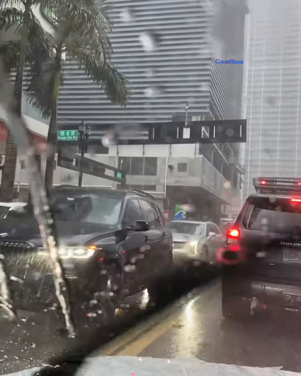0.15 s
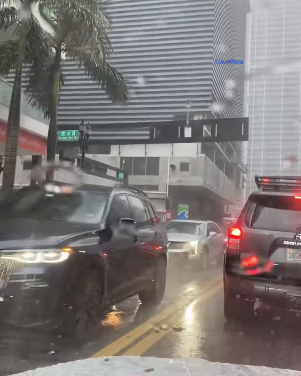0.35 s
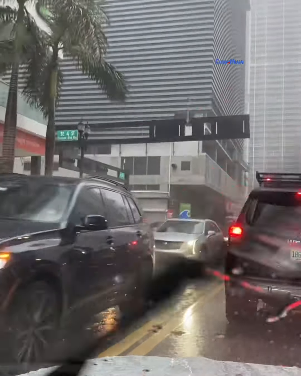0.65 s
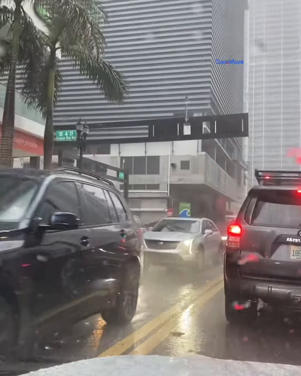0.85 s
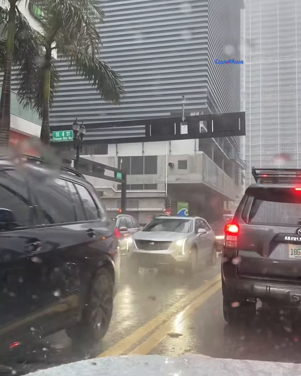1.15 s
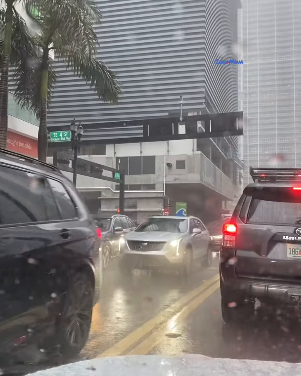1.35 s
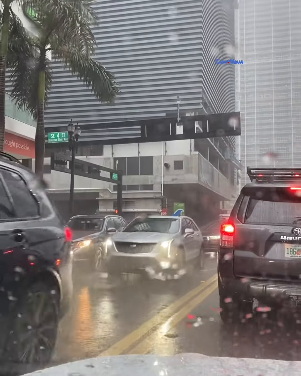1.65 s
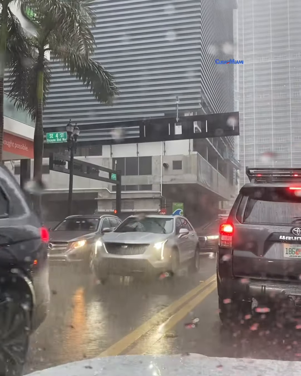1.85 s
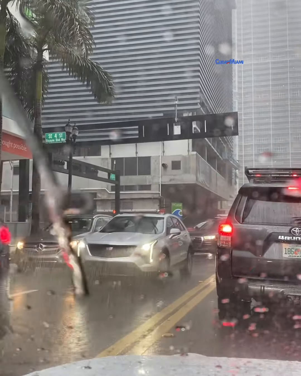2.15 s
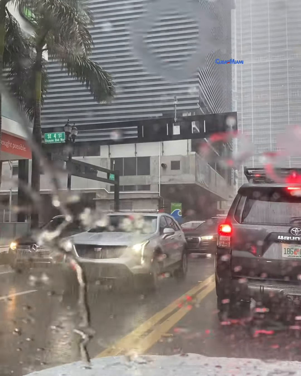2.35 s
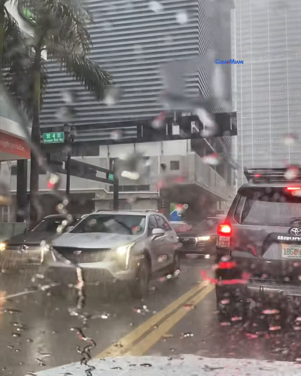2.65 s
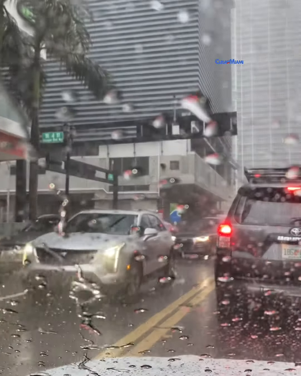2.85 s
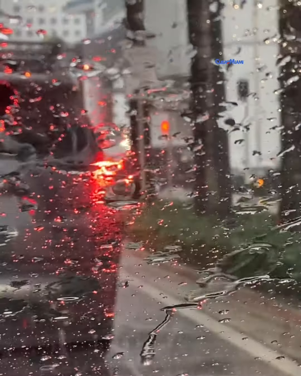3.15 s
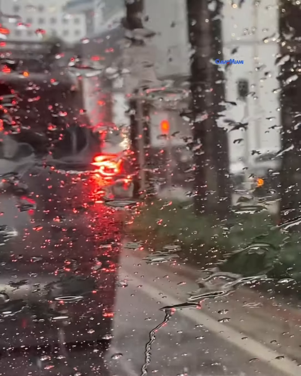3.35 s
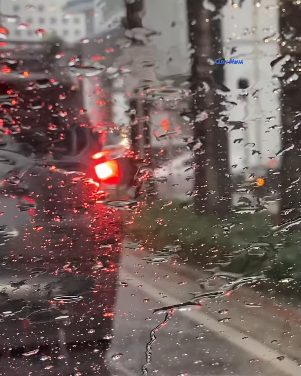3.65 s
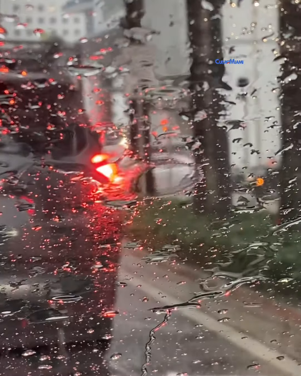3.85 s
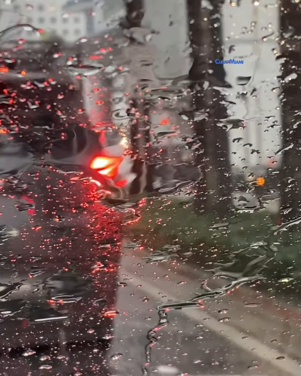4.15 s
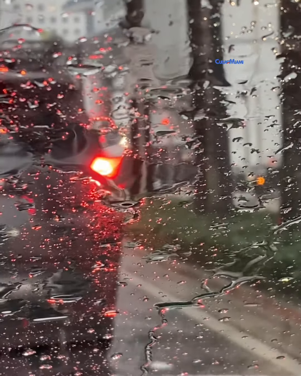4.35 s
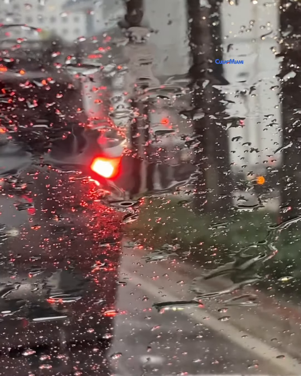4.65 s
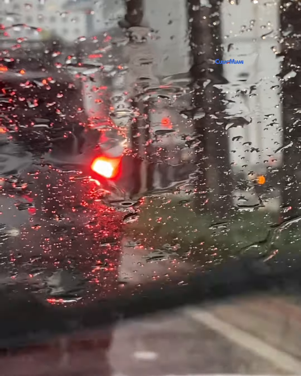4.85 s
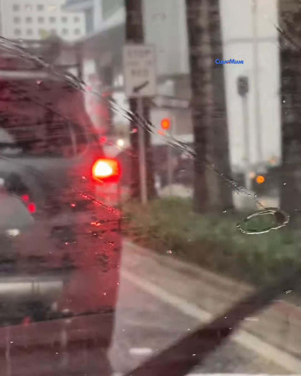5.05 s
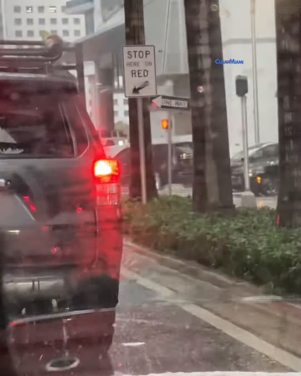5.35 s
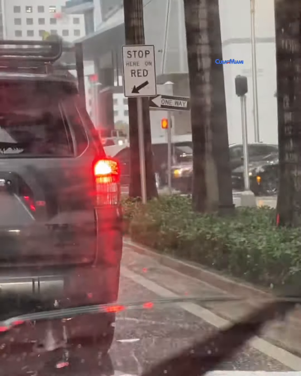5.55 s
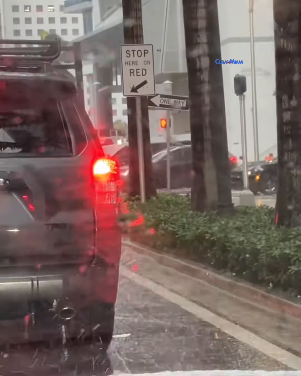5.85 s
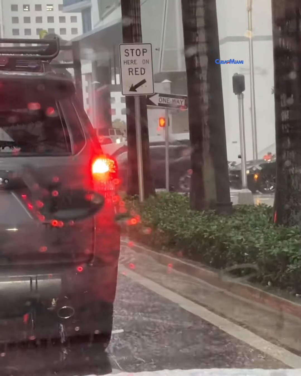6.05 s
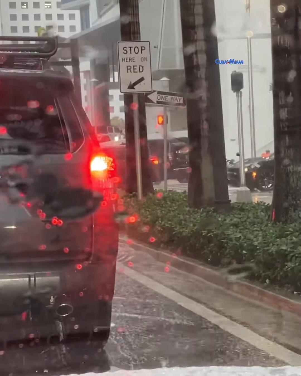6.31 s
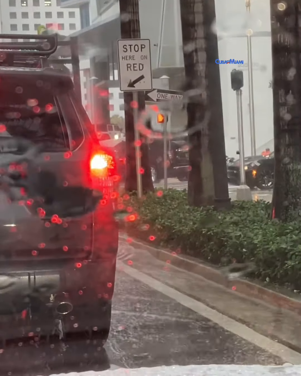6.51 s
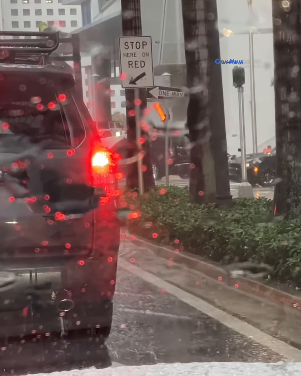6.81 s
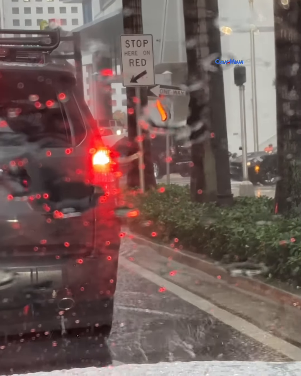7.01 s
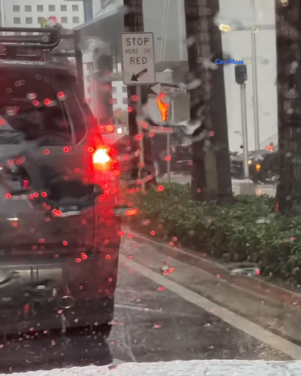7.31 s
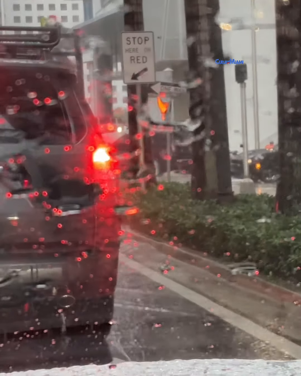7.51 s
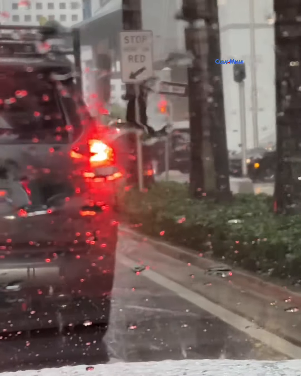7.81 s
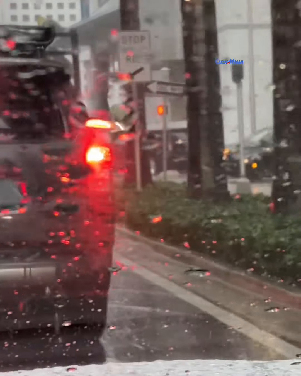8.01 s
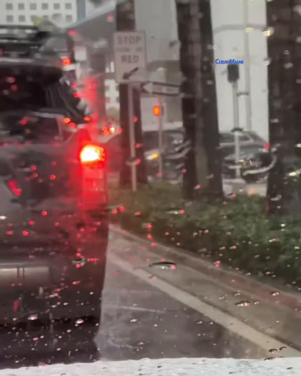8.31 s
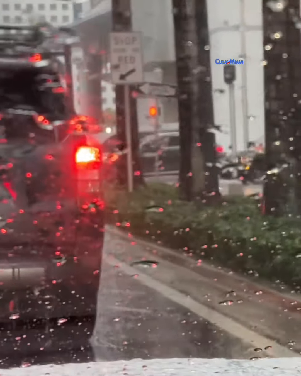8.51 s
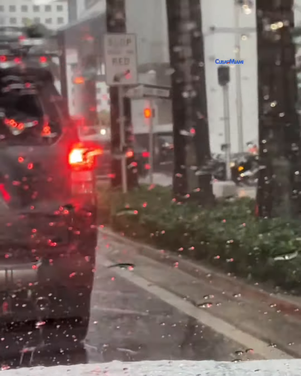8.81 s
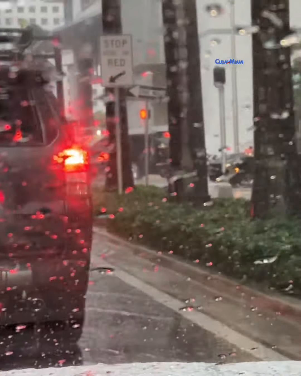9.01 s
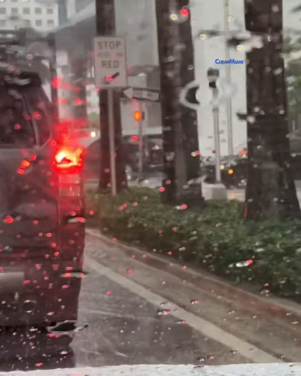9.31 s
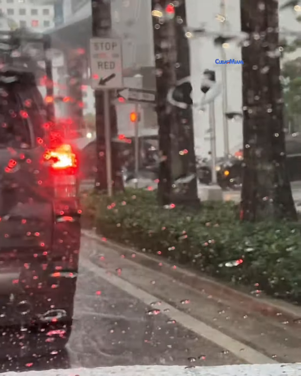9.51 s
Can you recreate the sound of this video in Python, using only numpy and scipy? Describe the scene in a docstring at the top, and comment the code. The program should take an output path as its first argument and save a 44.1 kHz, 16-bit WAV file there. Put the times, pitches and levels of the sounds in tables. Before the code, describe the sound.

Close stereo perspective inside a closed car waiting in city traffic. Dense rain roars and drums on the roof and hisses on the glass over a low engine throb, with wiper thumps near the start. At three seconds it cuts abruptly to much lighter rain: individual taps, small spatters and faint plinks. The wipers sweep again around five seconds with deep thuds, then sparse drops continue.

```python
"""Heavy rain on a car that waits in traffic, heard from inside: noise bursts of random size drum on the roof
and tick on the windshield, coloured by panel resonances. After three seconds the scene cuts to lighter rain,
in which single drops, swelling and dying bursts of noise, stand out. The wipers sweep twice: filtered noise for
the drag, gliding sines for the thumps where they turn and park. A faint sine squeaks once. Low noise rumbles
throughout, with the sine throb of the idling engine under the downpour."""
import sys
import numpy as np
from scipy import signal
from scipy.fft import rfft, irfft, next_fast_len
from scipy.io import wavfile

SR = 44100
rng = np.random.default_rng(int(sys.argv[2]) if len(sys.argv) > 2 else 0)


def wav_record(signal):
    """Record a signal, one row per channel, as 16-bit PCM in the file named by sys.argv[1]."""
    frames = np.transpose(np.atleast_2d(signal))
    bounded = np.clip(frames, -1, 1)
    # unit amplitude maps onto the largest positive 16-bit level
    quanta = np.round(bounded * 32767).astype(np.int16)
    wavfile.write(sys.argv[1], SR, quanta)


N = 426447
TIME = np.arange(N) / SR
HZ = np.fft.rfftfreq(N, 1 / SR)

# strength of the downpour before its trims: time_s, roof_patter_db, glass_hiss_db
DOWNPOUR_LEVELS = [(0, -42.5, -47.5), (.15, -41.5, -45.5), (.55, -45.5, -48.5), (.9, -45, -47),
                   (1.45, -46.5, -47.5), (2.08, -41.5, -43.5), (2.6, -40.5, -41.5), (2.85, -41, -44.5),
                   (3.08, -42.5, -44.5)]
# strength of the lighter rain before its trim: time_s, level_db
SHOWER_LEVELS = [(3.12, -53.5), (3.24, -52.5), (3.36, -56.5), (3.39, -53.5), (3.6, -51), (3.85, -49.5),
                 (4.28, -54.5), (4.4, -61.5), (4.49, -61), (4.53, -56), (4.7, -54), (5.15, -52.5),
                 (5.3, -49), (6.0, -50.5), (6.45, -51), (6.95, -53), (7.3, -56.5), (7.9, -59), (8.3, -56.5),
                 (9.1, -56.5), (9.35, -55.5), (9.55, -56)]
# strongest flurries of larger drops, before the panel trims: start_s, roof_db, glass_db, rise_s
FLURRIES = [(.114, -43, -59, 0.0079), (1.285, -42, -58, 0.0088), (1.574, -38.5, -55.5, 0.009),
            (3.425, -53, -65, 0.0059), (3.971, -50, -74, 0.0063), (4.775, -55, -68, 0.0065),
            (5.698, -46.5, -64, 0.0076), (6.595, -48, -71, .007), (6.861, -44.5, -69, 0.013),
            (6.94, -58, -71, 0.0068), (7.002, -47, -74, 0.0085), (7.16, -53, -80, 0.0099),
            (8.195, -50.5, -74, 0.0095), (8.253, -52, -69, 0.0082), (8.895, -56, -80, 0.0062),
            (9.012, -54, -70, 0.0062), (9.262, -49, -72, 0.011), (9.29, -57, -78, 0.0076)]
# relative colour of the rain as heard, with a dip near 14 kHz: frequency_hz, downpour_db, shower_db
RAIN_COLOUR = [(101, -12, -21), (245, 6.5, 2), (387, 2, 2.3), (587, 1.5, -1.7), (850, -2.5, -4.5),
               (1110, -5.5, -6), (1700, -8.6, -10), (2550, -11, -13.5), (4840, -11, -14.5),
               (6550, -10.5, -13), (8700, -16.5, -18.5), (12140, -21, -24.5), (13900, -32, -35),
               (15800, -24, -25)]
# resonances of the roof and glass, before scaling by boxiness: frequency_hz, width_hz, level_db
PANEL_MODES = [(430, 30, 2.5), (510, 46, 2), (845, 81, 8), (1135, 52, 3), (1380, 87, 1.2), (2260, 360, 3),
               (2745, 140, 6), (3620, 770, 4.5)]
# left-right correlation of the rain: frequency_hz, downpour_correlation (-1 to 1), shower_correlation (-1 to 1)
EAR_CORRELATION = [(131, 1, 0.75), (302, 0.88, 0.87), (630, 0.38, 0.43), (1420, 0.12, 0.082),
                   (2000, 0.07, 0.82), (3450, 0.03, 1), (4360, 0.32, 0.85), (7520, 1, 1),
                   (8540, 0.72, 0.66), (12500, 1, 0.96)]
# big drops close by, levels before the common trims: start_s, pane_tap_db, treble_tick_db, splat_length_s
BIG_DROPS = [(1.085, -26.5, -53, 0.0014), (1.1105, -27, -64, 0.0043), (2.1234, -26, -42, .003),
             (3.030, -36, -50, .004), (3.144, -41, -58, .002), (3.156, -40, -59, .003),
             (3.391, -31, -60, .004), (3.484, -42, -60, .002), (3.52, -34.5, -57, .002),
             (3.531, -31, -55, .003), (3.616, -33.5, -58, .003), (3.762, -39, -59, .003),
             (3.789, -34, -60, .005), (4.079, -33, -55, .003), (4.1263, -35, -60, .004),
             (4.207, -34, -70, .006), (4.348, -38, -63, .003), (4.5176, -39, -60, .0015),
             (4.536, -37, -60, .0025), (4.556, -34, -62, 0.0028), (4.574, -39, -59, .002),
             (4.7202, -33, -63, 0.001), (4.794, -34, -62, .0025), (4.881, -37, -57, .002),
             (5.218, -30.5, -56, 0.0056), (5.896, -38, -55, .003), (5.9604, -43, -56, .002),
             (6.602, -35, -68, .005), (6.7, -36, -58, .003), (6.871, -32, -64, 0.0083),
             (6.945, -35, -57, .004), (6.955, -38, -58, .002), (7.004, -32, -56, .004),
             (7.012, -35, -62, 0.0052), (7.147, -38, -62, 0.0033), (7.184, -31.5, -64, .008),
             (7.2835, -36.5, -57.5, .002), (7.608, -41, -60, .003), (7.690, -37, -61, .003),
             (7.784, -39, -62, 0.0034), (7.825, -34, -57, .0045), (7.924, -31.5, -63, .007),
             (7.962, -37, -64, .003), (8.011, -32.5, -76, .009), (8.328, -31.5, -75, 0.0089),
             (8.545, -33.5, -55.5, 0.0045), (8.797, -33, -56, 0.0039), (8.899, -43, -62, .003),
             (8.9665, -34, -61, .002), (9.139, -39, -61, 0.0022), (9.173, -42, -62, .003),
             (9.183, -43, -62, .002), (9.242, -35, -59, 0.0029), (9.284, -30, -52, .006),
             (9.343, -36, -59, .0035), (9.3715, -36, -58, .003), (9.388, -29, -53, 0.0039),
             (9.529, -44, -61, .003), (9.577, -35, -71, 0.0022), (9.597, -34, -58, 0.0051)]
# colour of the bright tick: frequency_hz, gain_db
TICK_COLOUR = [(1500, -20), (3000, -5), (5500, 5.5), (10000, 4.5), (13000, -4), (16000, -6)]
# colour of the tap on the pane: frequency_hz, gain_db
TAP_COLOUR = [(200, -9), (500, 4.5), (1100, 0.5), (3500, -0.5), (5500, -3.5), (9000, -20)]
# thumps of the wipers: start_s, level_db, first_pitch_hz, last_pitch_hz, swell_s, body_ring_db,
# knock_pitch_hz, knock_db, knock_swell_s, scuff_db
THUMPS = [(0.112, -33, 193, 167, 0.03, -32, 257, -36.5, 0.037, -64),
          (0.236, -33.5, 151, 183.5, 0.025, -40, 281, -29.5, 0.011, -48),
          (0.464, -16.5, 284, 118, 0.024, -22, 273, -18.5, 0.0097, -31),
          (0.476, -17.5, 69, 76.7, 0.018, -39, 130.3, -16.5, 0.018, -55),
          (0.654, -28, 151, 112, 0.021, -48, 270, -49, 0.0092, -62),
          (1.1, -22.5, 99, 57, 0.04, -50, 154, -32.5, 0.046, -50),
          (1.163, -23, 101, 81, 0.03, -44, 179, -44, 0.033, -60),
          (4.526, -32.5, 100, 166, 0.041, -33, 331, -42, 0.0086, -43),
          (4.604, -30, 250, 115, 0.015, -32, 399, -44.5, 0.021, -51),
          (4.6308, -13, 93, 92.6, 0.028, -30.5, 443, -38.5, 0.01, -42),
          (4.7014, -24, 93.5, 96, 0.033, -43, 325, -46, 0.024, -53),
          (5.03, -29.5, 90, 70, 0.04, -44, 230, -44, .02, -58),
          (5.134, -28, 267, 163, 0.021, -43, 331, -37, 0.011, -48),
          (5.3567, -19.5, 147, 62.4, 0.0266, -30, 147, -20, 0.026, -44),
          (5.3636, -15, 211, 130.7, 0.014, -25, 230, -23, 0.016, -40),
          (5.4104, -25, 131, 78.5, 0.0665, -39, 107, -27, 0.019, -54),
          (6.0, -25, 83.7, 49, 0.021, -38, 140.4, -27.5, 0.029, -58),
          (6.017, -36, 259, 170, .014, -47, 298, -41, 0.011, -47),
          (6.034, -23.5, 51.6, 73, 0.034, -40, 109, -25, 0.019, -58)]
# modes of the windshield and cabin, relative levels: frequency_hz, level_db, t60_s
BODY_MODES = [(66, -7, .55), (84, 0, .65), (167, 0, .24), (238, 0, .17), (305, -8, .12)]
# relative colour of rubber flipping on wet glass: frequency_hz, gain_db
SCUFF_COLOUR = [(120, -31), (300, 12), (500, -2), (800, -5.5), (1500, -29), (3000, -34)]
# strokes of the wipers, up then back, twice: start_s, length_s, shudder_db, fade_db_per_s
SWEEPS = [(0, 0.49, -33, 16), (.5, 0.53, -39, 17), (4.727, 0.52, -33.5, 13), (5.496, .72, -41, 2.5)]
# swells of the low rumble: centre_s, half_width_s, level_db
SWELLS = [(2.4, 0.44, -45), (3.72, 0.17, -42), (7.05, 0.17, -42.5)]
# relative colour of the shudder and the swells: frequency_hz, gain_db
DRAG_COLOUR = [(30, -7), (52, 8), (90, 1.5), (130, -2), (180, -7), (300, -14.5), (500, -29.5),
               (1200, -48.5)]
# relative colour of the cabin's low rumble: frequency_hz, downpour_db, shower_db
RUMBLE_COLOUR = [(20, -74, -91), (31.8, -72, -71), (45, -58.5, -57), (61, -57, -61.5), (80.4, -56.5, -60),
                 (100.5, -59, -65.5), (137, -60, -68), (161, -57, -70), (210, -65.5, -73.5),
                 (287, -70.5, -78), (452, -85, -93), (1200, -130, -130)]
# level balance between the channels: frequency_hz, left_over_right_db
BALANCE = [(120, 0), (350, 2), (750, 1.5), (1250, 3.5), (1800, 1.5), (2600, 0)]
# phase between the channels: frequency_hz, left_lead_rad
CHANNEL_PHASE = [(1500, 0), (5000, .25), (7000, 3.1), (8100, 3.3), (9750, 6.2), (11500, 6.5), (12700, 9.35),
                 (15000, 9.5)]

CUT_AT_S = 3.102  # time of the cut to the second scene, in lighter rain
GLASS_DB = -1.5  # in the lighter rain, the glass against the common strength
ROOF_FOLLOWS = 0.63  # share of the shower's changes in dB that the roof follows
FLURRY_RISE_S = 0.0071  # time in which a small chance flurry reaches its peak
FLURRIES_PER_S, FLURRY_DB = 6.5, -4  # chance flurries, level against the steady fall
PLINK_LOW_HZ, PLINK_HIGH_HZ = 400, 4500  # centre pitches of single drops, before each mode is scattered
SPOT_LOW_HZ, SPOT_HIGH_HZ, SPOT_Q = 1000, 5000, 2.5  # spots that big drops ring
TICK_SHARE = 0.48  # length of the bright tick as a share of the splat
TICK_SCATTER = 0.5  # separate path to each ear, added to the common tick
SPRAY_S, SPRAY_DB = 0.007, -18  # droplets thrown off: mean random delay and mean level
GLIDE_S = 0.0167  # time constant with which a thump settles on its last pitch
SWEEP_EDGE_S = 0.062  # the blades get going and stop within this time
CHIRP_AT_S, CHIRP_HZ, CHIRP_DB = 6.835, 1900, -48  # centre time, pitch and peak of the squeak
IDLE_HZ, IDLE_DB = 32.7, -47.5  # firing of the idling engine
EDGE_HZ = 15850  # upper band limit


def downpour(roof_db=-2.0, glass_db=-1.8):
    """Superposition: dense impacts nearly merge into noise, a few ring the panels, above the engine's throb."""
    roof = patter(per_s=1500, spread_db=3, wash_db=-5.0, crack=0.0026, tail_db=-12.5, t60=0.081)
    glass = patter(per_s=1300, spread_db=4.0, wash_db=-1.5, crack=0.00016, tail_db=-6.0, t60=0.042)
    roof_level = curve(DOWNPOUR_LEVELS)
    glass_level = curve(DOWNPOUR_LEVELS, order=2)
    rings = gain_of(roof_level - 5.5) * plinks(per_s=130, spread_db=3, cycles=28, tilt_db=-0.8)
    fall = rain(roof_level + roof_db, glass_level + glass_db, roof, glass, gust_db=0.79, boxiness=1.0, order=1)
    return fall + rings + rumble(level_db=-37.5, order=1) + idle()


def shower(roof_db=-2.5):
    """Sparse impacts: fewer drops separate to the ear, a few fat ones spattering and plinking among the fine."""
    roof = patter(per_s=350, spread_db=1.5, wash_db=-1.5, crack=0.002, tail_db=-6.5, t60=0.079)
    fine = patter(per_s=600, spread_db=4.0, wash_db=-5.0, crack=0.00036, tail_db=-5.5, t60=0.069)
    fat = patter(per_s=30, spread_db=1.2, wash_db=-20, crack=0.001, tail_db=-8, t60=0.09)
    glass = evened(fine + gain_of(-8) * fat)
    strength = curve(SHOWER_LEVELS) + roof_db
    on_roof = strength.mean() + ROOF_FOLLOWS * (strength - strength.mean())
    rings = gain_of(on_roof - 1.8) * plinks(per_s=75, spread_db=3.2, cycles=22, tilt_db=-0.6)
    fall = rain(on_roof, strength + GLASS_DB, roof, glass, gust_db=0.71, boxiness=0.22, order=2)
    wavering_rumble = rumble(level_db=-41.5, order=2) * gain_of(0.49 * wander(4))
    return fall + rings + wavering_rumble


def rain(roof_db, glass_db, roof_drops, glass_drops, gust_db, boxiness, order):
    """Transmission: the padded roof passes the low patter, the glass the bright ticks; gusts shake both."""
    gust = unevenness(gust_db)
    roof_level = rainfall(roof_db + gust, flurry_db=-3.0, order=1)
    glass_level = rainfall(glass_db + gust, flurry_db=10.5, order=2)
    low = 1 / (1 + (HZ / 1800) ** 4)  # share of power that belongs to the roof
    roof = panel(roof_drops, roof_level, (600, 1500), np.sqrt(low), boxiness, order)
    glass = panel(glass_drops, glass_level, (2000, 6000), np.sqrt(1 - low), boxiness, order)
    return roof + glass


def patter(per_s, spread_db, wash_db, crack, tail_db, t60, count=60):
    """Poisson impacts: drops of random size excite random spots, in two unrelated responses, over a noise wash."""
    size = gain_of(spread_db * np.minimum(rng.exponential(1, N), 3.6))
    size *= rng.random(N) < per_s / SR
    spot = rng.integers(0, count, N)
    out = np.zeros((2, N))
    paths = np.array([[splash(crack, tail_db, t60, ring=0.26) for path in range(2)] for k in range(count)])
    for i in np.flatnonzero(size):
        add(out, i / SR, size[i] * paths[spot[i]])
    return evened(evened(out) + gain_of(wash_db) * rng.standard_normal((2, N)))


def splash(crack, tail_db, t60, ring):
    """Impulse response of unit energy: a short crack, cabin reflections and a broad resonance of the spot."""
    t = np.arange(SR // 18) / SR
    decay = np.exp(-t / crack) + gain_of(tail_db - 60 * t / t60)
    burst = rng.standard_normal(len(t)) * decay
    spot_hz = 700 * 7 ** rng.random()
    burst = evened(burst) + ring * evened(signal.lfilter(*signal.iirpeak(spot_hz, 2, SR), burst))
    return burst / np.linalg.norm(burst)


def panel(drops, level_db, band, share, boxiness, order):
    """Spectral and modal filtering, then mid and side mixed for the wanted correlation; level is set in the band."""
    modes_db = boxiness * sum(db / (1 + (2 * (HZ - hz) / width) ** 2) for hz, width, db in PANEL_MODES)
    colour = gain_of(read(RAIN_COLOUR, HZ, order) + modes_db + cabin_ripple(ripple_db=2.5))
    colour *= HZ ** 2 / (HZ ** 2 + 80 ** 2)
    in_band = (HZ > band[0]) & (HZ < band[1])
    colour *= share / np.sqrt(np.mean(colour ** 2 * in_band))
    same = np.clip(read(EAR_CORRELATION, HZ, order), -1, 1)
    mid = shaped(drops[0], colour * np.sqrt((1 + same) / 2))
    side = shaped(drops[1], colour * np.sqrt((1 - same) / 2))
    return np.array([mid + side, mid - side]) * gain_of(level_db)


def cabin_ripple(ripple_db):
    """Interference of cabin reflections: narrow, steady random peaks and dips in the middle of the spectrum."""
    knots = np.arange(0, SR / 2, 45)
    ripple = np.interp(HZ, knots, rng.standard_normal(len(knots)))
    return ripple_db * ripple * HZ / (HZ + 400) / (1 + (HZ / 5000) ** 2)


def rainfall(steady_db, flurry_db, order):
    """Power addition: the strong flurries add to the steady fall on one panel; returns dB."""
    power = gain_of(steady_db) ** 2
    for row in FLURRIES:
        add(power, row[0], gain_of(row[order] + flurry_db) ** 2 * flurry(row[-1]))
    return 10 * np.log10(power)


def unevenness(gust_db):
    """Random modulation: gusts lift and lower the rain, chance flurries lift it; returns dB."""
    lifts = np.zeros(N)
    for i in np.flatnonzero(rng.random(N) < FLURRIES_PER_S / SR):
        add(lifts, i / SR, flurry(FLURRY_RISE_S))
    return gust_db * wander(14) + 10 * np.log10(1 + gain_of(FLURRY_DB) ** 2 * lifts)


def flurry(rise_s):
    """Asymmetric power envelope: a fast rise to 1 and a slower decay."""
    age = np.arange(SR // 8) / SR / rise_s
    return age * np.exp(1 - age)


def plinks(per_s, spread_db, cycles, tilt_db, count=3):
    """Modal excitation: single drops ring small spots, each in a few brief modes; tilt is per octave."""
    t = np.arange(SR // 16) / SR
    out = np.zeros((2, N))
    for i in np.flatnonzero(rng.random(N) < per_s / SR):
        centre = rng.uniform(np.log(PLINK_LOW_HZ), np.log(PLINK_HIGH_HZ))
        hz = np.exp(centre + rng.normal(0, 0.16, (count, 1)))
        fall_db = 60 * t * np.sqrt(hz * PLINK_LOW_HZ) / cycles  # higher modes die sooner
        modes = gain_of(tilt_db * np.log2(hz / PLINK_LOW_HZ) - fall_db) * np.sin(2 * np.pi * hz * t)
        paths = rng.standard_normal((2, count)) + rng.standard_normal(count)  # each ear plus a common part
        size = gain_of(spread_db * min(rng.exponential(), 2))
        add(out, i / SR, size * evened(paths) @ modes)
    return evened(out)


def big_drops(tick_db, tap_db):
    """Impact on water and plate: each close drop gives a bright tick, a duller tap of the pane, then spray."""
    ticks, taps = np.zeros((2, 2, N))
    for s, tap, tick, length in BIG_DROPS:
        direct, left, right = [splat(length * TICK_SHARE, tail_db=-19, t60=0.07) for path in range(3)]
        bright = direct + TICK_SCATTER * np.array([left, right])
        dull = rung(splat(length, tail_db=-17, t60=0.09), ring=0.33)
        add(ticks, s, gain_of(tick + tick_db) * spattered(bright))
        add(taps, s, gain_of(tap + tap_db) * spattered(dull))
    return shaped(ticks, gain_of(read(TICK_COLOUR, HZ))) + shaped(taps, gain_of(read(TAP_COLOUR, HZ)))


def splat(length, tail_db, t60):
    """Transient of unit energy: a drop spreads and collapses on the scale of length (s); the cabin answers."""
    t = np.arange(SR // 12) / SR
    swell = 1 - np.exp(-(2 * np.pi * t / length) ** 2)
    decay = np.exp(-t / length) + gain_of(tail_db - 60 * t / t60)
    burst = rng.standard_normal(len(t)) * swell * decay
    return burst / np.linalg.norm(burst)


def rung(hit, ring):
    """Local resonance: the spot that is hit adds a short ring at a random pitch."""
    hz = np.exp(rng.uniform(np.log(SPOT_LOW_HZ), np.log(SPOT_HIGH_HZ)))
    out = evened(hit) + ring * evened(signal.lfilter(*signal.iirpeak(hz, SPOT_Q, SR), hit))
    return out / np.linalg.norm(out)


def spattered(hit, count=5):
    """Secondary impacts: a big drop bursts and its weaker droplets land again after random delays."""
    out = hit.copy()
    for delay, db in zip(rng.exponential(SPRAY_S, count), rng.normal(SPRAY_DB, 2.8, count)):
        add(out, SPRAY_S / 2 + delay, gain_of(db) * hit)
    return out


def wipers():
    """Friction and impact: blades drag over the glass; gliding thumps at the turns set the body ringing."""
    out = shudder()
    t = np.arange(SR // 2) / SR
    ring = sum(gain_of(db - 60 * t / t60) * np.sin(2 * np.pi * hz * t) for hz, db, t60 in BODY_MODES)
    ring *= 1 - np.exp(-(t / 0.015) ** 2)  # soft onset
    for s, db, first_hz, last_hz, swell, ring_db, knock_hz, knock_db, knock_swell, scuff_db in THUMPS:
        turns = np.cumsum(last_hz + (first_hz - last_hz) * np.exp(-t / GLIDE_S)) / SR
        push = (t / swell * np.exp(1 - t / swell)) ** 4.3 * np.sin(2 * np.pi * turns)
        # the blade flips over with a short knock and a scuff of rubber
        flip = t / knock_swell * np.exp(1 - t / knock_swell)
        knock = flip ** 3.5 * np.sin(2 * np.pi * knock_hz * t)
        scuff = flip ** 2 * evened(shaped(rng.standard_normal(len(t)), gain_of(read(SCUFF_COLOUR, HZ))))
        thump = gain_of(db) * push + gain_of(ring_db) * ring
        add(out, s, thump + gain_of(knock_db) * knock + gain_of(scuff_db) * scuff)
    return out


def shudder():
    """Friction noise: the glass shudders under the dragging blades; the same noise swells as low rumble."""
    level = sum(gain_of(db) * np.exp(-((TIME - centre) / width) ** 2) for centre, width, db in SWELLS)
    for start, length, db, fade in SWEEPS:
        age = np.clip(TIME - start, 0, length)
        edges = np.minimum(np.minimum(age, length - age) / SWEEP_EDGE_S, 1)
        level = level + edges * gain_of(db - fade * age)  # the shudder fades as the glass clears
    return level * evened(shaped(rng.standard_normal(N), gain_of(read(DRAG_COLOUR, HZ))))


def chirp():
    """Phase modulation: random phase roughens one brief, squeaking sine."""
    swell = np.exp(-((TIME - CHIRP_AT_S) / 0.014) ** 2)
    return gain_of(CHIRP_DB) * swell * np.sin(2 * np.pi * CHIRP_HZ * TIME + 0.5 * wander(120))


def idle():
    """Periodic firing: the idling engine throbs as a low sine of slowly wandering phase."""
    return gain_of(IDLE_DB) * evened(np.sin(2 * np.pi * IDLE_HZ * TIME + 0.22 * wander(1.7)))


def rumble(level_db, order):
    """Cavity boom: engine, traffic and drumming roof as one low noise in the closed cabin, alike in both ears."""
    return gain_of(level_db) * evened(shaped(rng.standard_normal(N), gain_of(read(RUMBLE_COLOUR, HZ, order))))


def gain_of(db):
    """Decibel law: amplitude ratio of a level."""
    return 10 ** (np.asarray(db) / 20)


def evened(x):
    """Normalization to unit RMS."""
    return x / np.sqrt(np.mean(x ** 2) + 1e-20)


def read(points, hz, order=1):
    """Interpolation of a spectrum table's column number order on a log-frequency axis."""
    table = np.transpose(points)
    return np.interp(np.log(hz + 1), np.log(table[0] + 1), table[order])


def curve(rows, order=1):
    """Linear interpolation over time of a level table's column number order."""
    table = np.transpose(rows)
    return np.interp(TIME, table[0], table[order])


def shaped(x, gain):
    """Linear filtering: multiplies the spectrum by a gain given on the grid HZ."""
    size = next_fast_len(x.shape[-1] + 2048)
    response = np.interp(np.fft.rfftfreq(size, 1 / SR), HZ, gain)
    return irfft(rfft(x, size) * response, size)[..., :x.shape[-1]]


def add(mix, s, sound):
    """Superposition: adds a sound in place from time s (s), cut at the end of the mix."""
    part = mix[..., max(round(s * SR), 0):][..., :sound.shape[-1]]
    part += sound[..., :part.shape[-1]]


def wander(rate):
    """Band-limited chance: a random curve of unit RMS, varying up to about rate times per second."""
    steps = np.arange(0, N / SR + 1, 0.5 / rate)
    return evened(np.interp(TIME, steps, rng.standard_normal(len(steps))))


def scene():
    """Superposition of all sources; a cut, crossfaded in 2 ms, joins two scenes of rain."""
    after_cut = np.clip((TIME - CUT_AT_S) / 0.002 + 0.5, 0, 1)
    weather = np.sqrt(1 - after_cut) * downpour() + np.sqrt(after_cut) * shower()
    return weather + wipers() + big_drops(tick_db=28.0, tap_db=13.5) + chirp()


def record(dry):
    """Interchannel difference: the two channels differ in level and, in the treble, phase; then a band limit."""
    lean = gain_of(read(BALANCE, HZ) / 2) * np.exp(0.5j * read(CHANNEL_PHASE, HZ))  # half to each side
    pair = np.array([shaped(dry[0], lean), shaped(dry[1], 1 / lean)])
    lowpass = signal.firwin(511, EDGE_HZ, window=("kaiser", 9), fs=SR)
    return signal.oaconvolve(pair, lowpass[None], "same")


dry = scene()
out = record(dry)
wav_record(out)
```